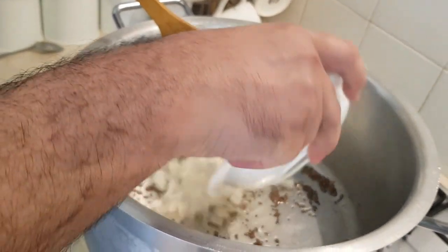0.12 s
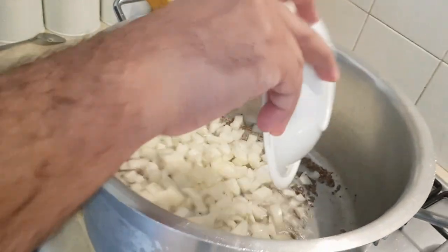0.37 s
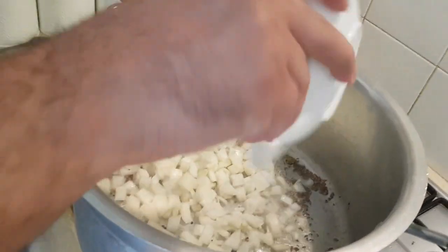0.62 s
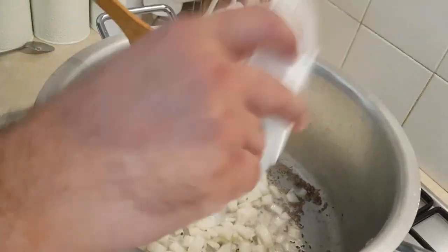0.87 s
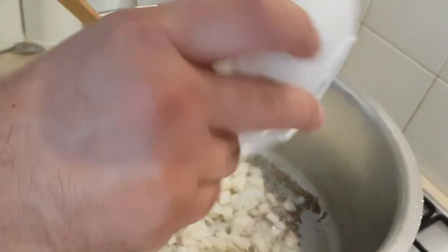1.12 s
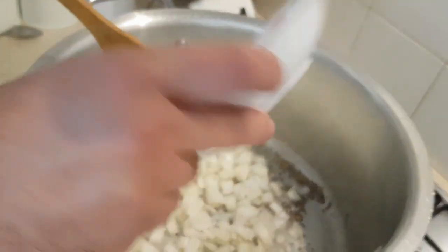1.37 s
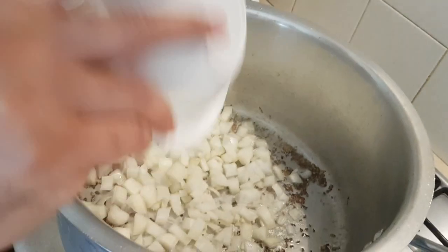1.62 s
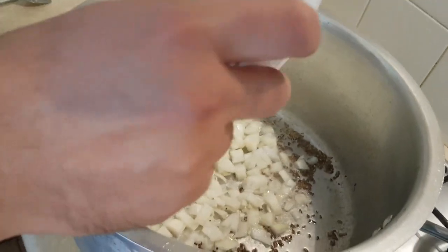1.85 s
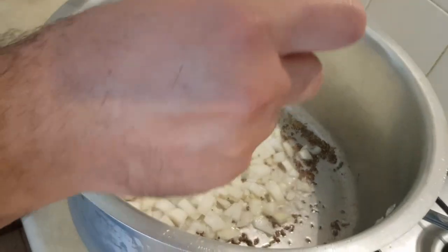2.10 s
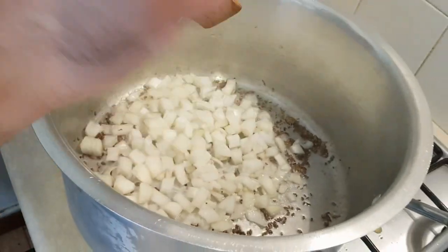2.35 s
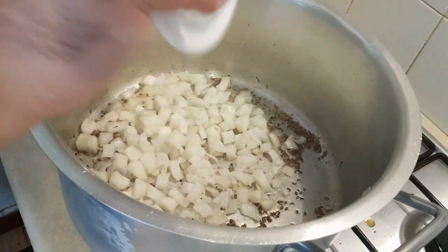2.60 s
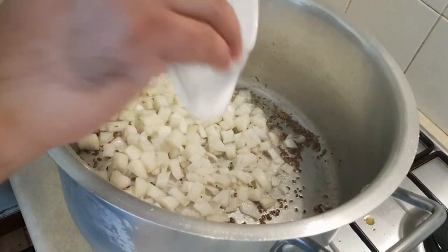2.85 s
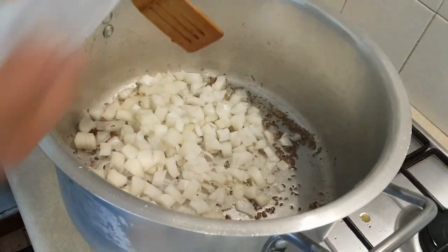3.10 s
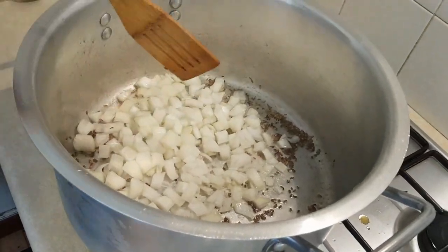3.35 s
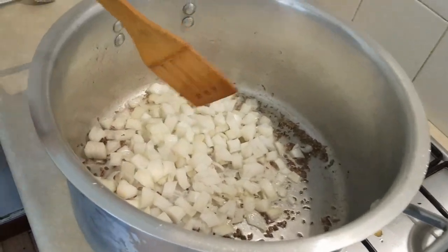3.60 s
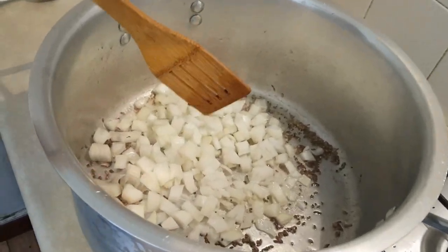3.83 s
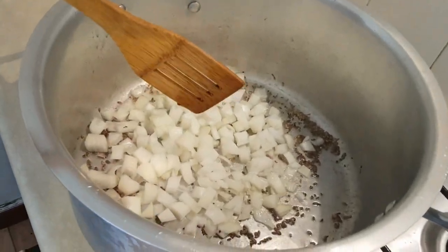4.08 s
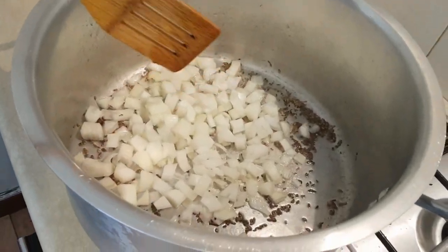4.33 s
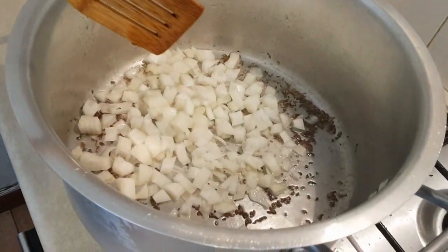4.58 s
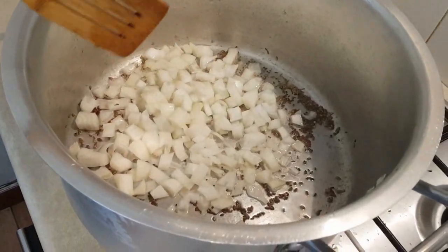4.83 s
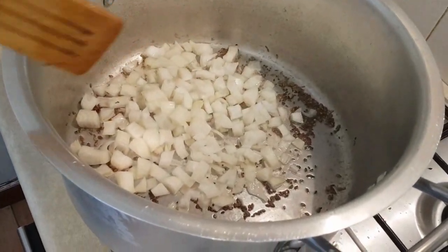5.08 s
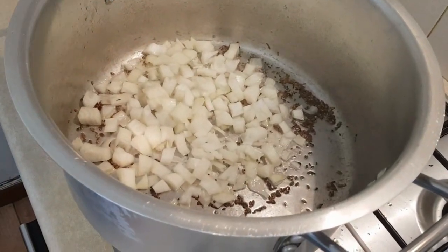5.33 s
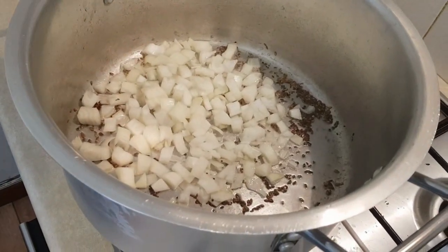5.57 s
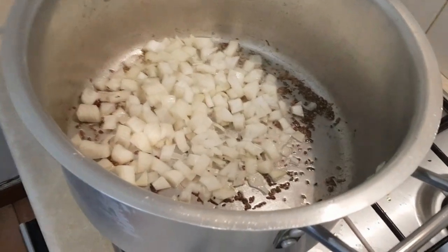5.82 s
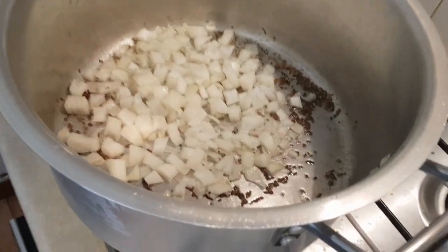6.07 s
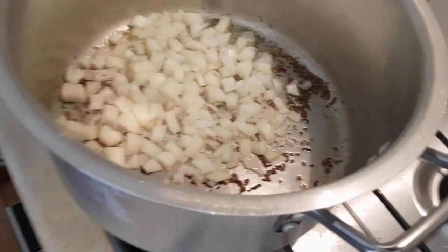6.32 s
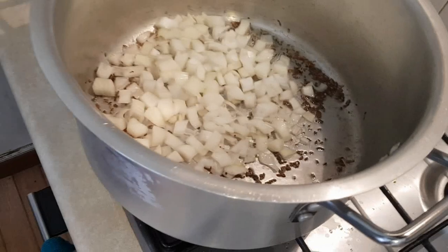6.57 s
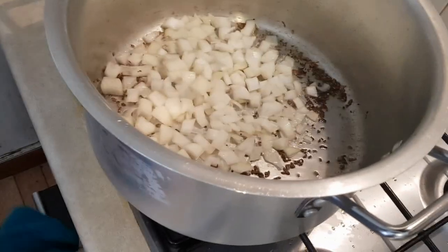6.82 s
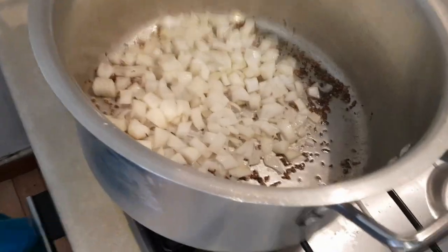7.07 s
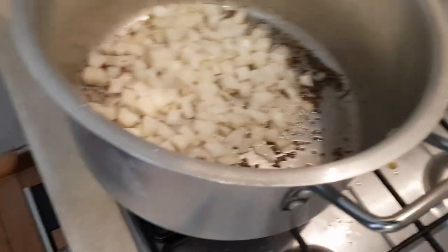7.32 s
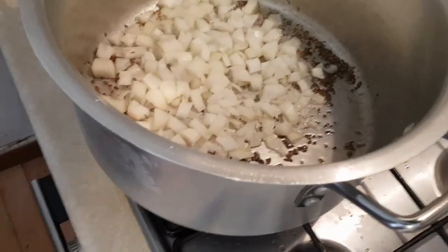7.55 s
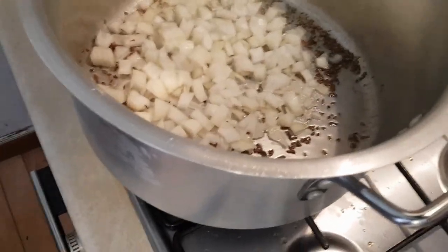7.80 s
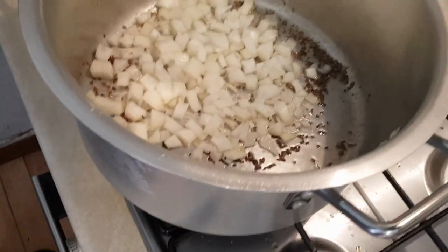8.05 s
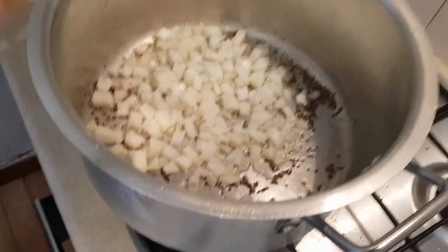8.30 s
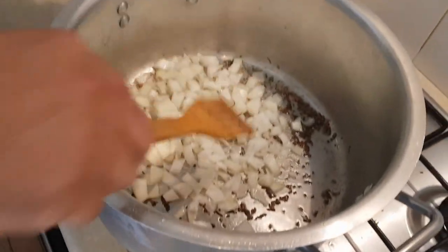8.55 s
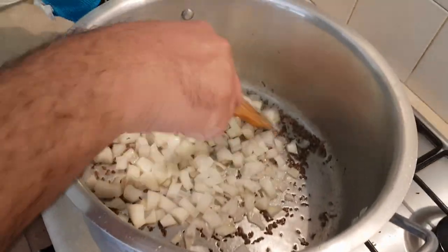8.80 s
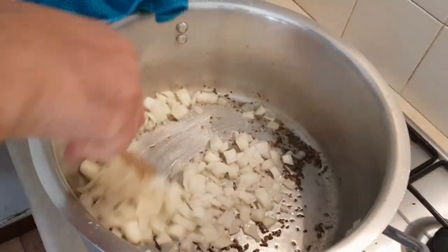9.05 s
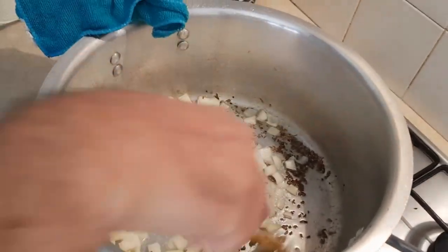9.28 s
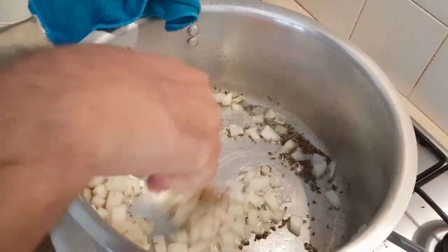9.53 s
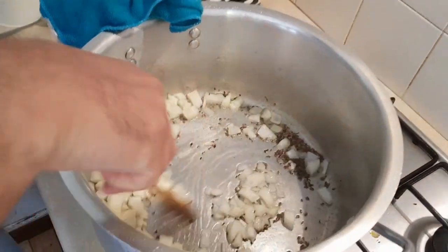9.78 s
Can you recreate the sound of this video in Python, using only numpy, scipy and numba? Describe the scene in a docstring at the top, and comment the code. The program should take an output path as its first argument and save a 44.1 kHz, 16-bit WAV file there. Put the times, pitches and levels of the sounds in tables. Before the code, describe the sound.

Diced onions tumble into hot oil in a wide metal pot, flare into a loud sizzle, then fry steadily with pops until a spatula stirs them.

```python
"""Onions frying in a wide pot

Diced onions tumble into hot oil in a wide metal pot and sizzle; late on a wooden spatula stirs them.
Steam bubbles, made of thousands of short dying rings, echo round the pot, and single drops pop and spatter.
Noise and knocks through the pot's resonances make the falling pieces and the spatula on its bottom.
Something is set down on the counter with dull thuds of shaped noise, over a kitchen's mains hum and rumble.
A two-port microphone hears it all, with every source leaning left."""
import sys
import numpy as np
from scipy import signal
from scipy.fft import rfft, irfft, next_fast_len
from scipy.io import wavfile
from scipy.ndimage import uniform_filter1d
from numba import njit

SR = 44100
rng = np.random.default_rng(int(sys.argv[2]) if len(sys.argv) > 2 else 0)


def attenuation_scalar(level_db):
    """Turn a level in dB into a linear amplitude multiplier (20 dB per decade)."""
    decades = np.asarray(level_db, float) / 20
    return 10 ** decades


def inscribe(sig):
    """Save sig as 16-bit PCM at rate SR to the path in sys.argv[1].

    A 1-D sig is mono; a 2-D sig holds one channel per row.
    Samples are clipped to [-1, 1] before scaling.
    """
    pcm = np.round(np.clip(np.atleast_2d(sig).T, -1, 1) * 32767)
    wavfile.write(sys.argv[1], SR, pcm.astype(np.int16))


N = 437031
TIME = np.arange(N) / SR
SIDES = np.array([[1], [-1]])  # left, right


def curve(rows, column=1):
    """One column of a table, interpolated along time."""
    rows = np.array(rows, float)
    return np.interp(TIME, rows[:, 0], rows[:, column])


def along(points, hz):
    """Value of (Hz, value) points on a log frequency axis."""
    points = np.array(points, float)
    return np.interp(np.log(hz + 1), np.log(points[:, 0] + 1), points[:, 1])


def shape(x, gain):
    """Weights the spectrum by gain(Hz)."""
    size = next_fast_len(N)
    hz = np.arange(size // 2 + 1) * SR / size
    return irfft(rfft(x, size) * gain(hz), size)[..., :N]


def unit(x):
    """Scales the middle of the image to rms 1."""
    return x / np.std(np.mean(np.atleast_2d(x), axis=0))


def band(x, lo_hz, hi_hz):
    """Band-pass."""
    return signal.sosfilt(signal.butter(2, [lo_hz, hi_hz], "bandpass", fs=SR, output="sos"), x)


def pan(x, left_db):
    """Makes the left louder than the right by left_db."""
    return x * attenuation_scalar(left_db * SIDES / 2)


def walk(rate):
    """Random levels, each held 1 / rate s and slewed to the next; spread 1."""
    hold = int(SR / rate)
    levels = np.repeat(rng.standard_normal(N // hold + 1), hold)
    levels = uniform_filter1d(levels, hold // 2 + 1)[:N]
    return levels / levels.std()


def swell(s, rise_s, hold_s, fall_s):
    """Envelope that rises to 1 at s, holds, then dies away, to a third in about fall_s."""
    rise = np.clip(1 + (TIME - s) / rise_s, 0, 1) ** 2
    return rise * np.exp(-np.maximum(TIME - s - hold_s, 0) / fall_s)


def even(x, over_s):
    """Divides noise by its own smoothed loudness, so its level holds steady over over_s; rms near 1."""
    power = uniform_filter1d(np.mean(x, axis=0) ** 2, int(over_s * SR))
    return x / np.sqrt(power + 0.061 * power.mean())


@njit
def grains(count, start, hz, cycles, size, lag):
    """Each burst is a short dying ring that reaches the two ports lag samples apart."""
    out = np.zeros((2, count + 8192))
    for g in range(len(start)):
        # turn and decay per sample: down to about a third after the given cycles
        step = np.exp((2j * np.pi - 1 / cycles[g]) * hz[g] / SR)
        length = min(int(6 * cycles[g] * SR / hz[g]) + 2, 3000)
        for c in range(2):
            t = start[g] + 64 + (c - .5) * lag[g]
            i = int(t) + 1
            z = size[g] * step ** (i - t)  # starts between samples
            for k in range(length):
                out[c, i + k] += z.imag
                z *= step
    return out[:, 64:count + 64]


def bursts(start, hz, size, cycles, echo_db=-5, t60_s=.05, aside=0.37, count=5):
    """Direct rings plus echoes off the pot walls; every burst has its own place, so its own echoes."""
    u = rng.random((len(start), count + 1, 2)).T
    late = t60_s / 3 * u[0] * (np.arange(count + 1) > 0)[:, None]  # s; the first is the direct sound
    sign = np.where(late > 0, np.sign(u[1] - .5), 1)
    gain = sign * attenuation_scalar(min(echo_db, -4) * (late > 0) - 60 * late / t60_s)
    # up to 22 samples between the ports; direct sound comes from nearer the middle
    lag = 44 * (u[1] - .5) * np.where(late > 0, 1, aside)
    every = lambda v: (v + 0 * late).ravel()
    return grains(N, every(start + late * SR), every(hz), every(cycles), every(size * gain), lag.ravel())


# Resonances of the pot bottom and of the air inside.
# Each row: frequency in Hz, width in Hz, relative level in dB.
POT_MODES = [(299, 48, -2), (398, 82, 1.5), (484, 140, 0), (653, 41, -5.5), (760, 23, -10.5),
             (826, 20.6, -5.5), (1250, 91, 5), (1496, 46, -8.5), (2059, 55, -0.5)]


def pot(push, upper_db=0):
    """The pot's resonances under a push; it is too small to send out bass."""
    out = 0
    for hz, width, db in POT_MODES:
        r, w = np.exp(-np.pi * width / SR), 2 * np.pi * hz / SR
        ring = signal.lfilter([np.sin(w), -np.sin(w)], [1, -2 * r * np.cos(w), r * r], push) / w
        out = out + attenuation_scalar(db + upper_db * (hz > 600)) * ring
    return band(band(out, 210, 3400), 210, 3400)


# How fiercely the oil fries. Each row: time in seconds, level of the small bubbles in dB.
FRYING = [(0, -30), (.04, -24), (.23, -19), (.39, -19.5), (.49, -21.5), (.55, -23), (.85, -25.5),
          (1.25, -29), (2.5, -31), (3.05, -30.5), (3.4, -29), (4.2, -29), (4.85, -30), (5.6, -30.5),
          (7.0, -30), (8.55, -32.5), (9.03, -30), (9.27, -23.5), (9.5, -24), (9.91, -24)]
# Brief changes of the frying.
# Each row: centre in seconds, reach to either side in seconds, change of small and of large bubbles in dB.
FLARES = [(3.2, .2, 1, -0.5), (3.8, 0.24, -1.5, -0.5), (4.38, 0.074, 3.5, 5), (5.275, 0.36, 1, 1.5),
          (6.813, 0.22, 1.5, -0.5), (7.473, 0.2, 0.5, 1.5), (8.077, 0.57, 1.5, 2)]
LARGE_DB, LARGE_PER_DB = -8.5, 0.5541  # large against small at -30 dB, and their extra gain per dB


def fierceness():
    """Levels of small and large bubbles in dB: the slow course plus the brief changes."""
    small = curve(FRYING)
    large = small + LARGE_DB + LARGE_PER_DB * (small + 30)
    for s, reach, small_db, large_db in FLARES:
        flare = np.clip(1 - abs(TIME - s) / reach, 0, 1)
        small = small + small_db * flare
        large = large + large_db * flare
    return small, large


def spurts(count, size_db, fade_s):
    """Sudden releases of steam that die away, in dB."""
    u = rng.random((count, 2)).T
    kick = np.zeros(N)
    kick[(u[0] * (N - 1)).astype(int)] = -size_db * np.log(u[1] + 1e-9)
    return np.minimum(signal.lfilter([1], [1, -np.exp(-1 / (fade_s * SR))], kick), 3.5)


# Colour of the bubble bursts. Each row: frequency in Hz, gain in dB.
BUBBLE_COLOUR = [(530, -21.5), (900, -12), (1180, -20), (1250, -17), (1650, -5.5), (1870, -9), (2500, -3.5),
                 (3510, -3), (4010, -2.5), (6920, -1.5), (12900, 6), (15600, 7), (16400, -63)]
CALMING_PER_DB = 1  # fiercer frying is denser, so single spurts and snaps stand out less


def bubbles(lo_hz, hi_hz, count, spread_db, cycles, spurt_db):
    """Bursts of steam at random pitches, their sizes drawn with spread_db, swelling in spurts."""
    u = rng.random((count, 3)).T
    calm = np.clip(2.5 - CALMING_PER_DB * (curve(FRYING) + 30), 0, 1)
    start = u[0] * (N - 1)
    hz = lo_hz + (hi_hz - lo_hz) * u[1]
    # a negative spread leaves some bursts quieter
    size_db = np.minimum(-spread_db * np.log(u[2] + 1e-9), 12) + (spurt_db * calm)[start.astype(int)]
    rings = bursts(start, hz, np.sqrt(hz) * attenuation_scalar(size_db), cycles)
    return unit(shape(rings, lambda f: attenuation_scalar(along(BUBBLE_COLOUR, f))))


def crackle(count):
    """Droplets that snap singly, each a dry click of its own pitch and size, a few far louder."""
    u = rng.random((count, 3)).T
    size = attenuation_scalar(np.minimum(-4.0 * np.log(u[2] + 1e-9), 13))
    snaps = bursts(u[0] * (N - 1), 4200 * 3.0 ** u[1], size, 1.2, -8, 0.0116, aside=0.15)
    return unit(band(snaps, 2600, 15000))


THIN_START_S = 0.26  # the low notes of the frying fill in as the oil gets covered
CRACKLE_DB = -14.5  # snaps against the small bubbles, at a fierceness of -32 dB


def sizzle():
    """Small and large steam bubbles share spurts and add their own; the large ones ring the pot."""
    spurt = 0.028 * walk(6.7) + spurts(count=400, size_db=1.5, fade_s=0.012)
    small_spurt = spurt + spurts(count=150, size_db=0.9, fade_s=0.02)
    large_spurt = 1.4 * spurt + spurts(count=160, size_db=4.0, fade_s=0.0043)
    small = bubbles(6800, 13870, count=60000, spread_db=0.0, cycles=0.59, spurt_db=small_spurt)
    large = bubbles(865, 5850, count=30000, spread_db=-0.5, cycles=1.26, spurt_db=large_spurt)
    # the fiercer the frying, the thinner its lowest notes
    opening = np.clip(1 - TIME / THIN_START_S, 0, 1)
    thinning = np.clip(0.039 * (curve(FRYING) + 30) + 0.7 * opening, 0, .9)
    large = large - thinning * band(large, 430, 4300)
    # the frying shakes the bottom and rings the air in the pot, which colours it
    shaking = rng.standard_normal((2, N)) + 0.62 * rng.standard_normal(N)
    shaken = unit(pot(shaking, 2.3))
    large = large + attenuation_scalar(-16.5) * shaken + attenuation_scalar(-15.5) * unit(pot(large, 15))
    snap_db = CRACKLE_DB - CALMING_PER_DB * (curve(FRYING) + 32.0)
    small = small + attenuation_scalar(snap_db) * crackle(count=5000)
    small_db, large_db = fierceness()
    return attenuation_scalar(small_db) * pan(small, 0.56) + attenuation_scalar(large_db) * pan(large, 3.3)


# Heaps of pieces landing on the bottom, later pushed along it.
# Each row: time in seconds, level in dB, upper modes against it in dB.
HEAPS = [(0.0, -37, 5), (.028, -29.5, -3), (.055, -32.5, 0), (0.083, -22, -8), (.1, -29, -6),
         (.12, -24.5, -4), (0.148, -18.5, -9), (0.186, -29, -6), (.213, -21, -11), (.255, -28, -17),
         (.275, -30, -17), (.335, -32, -17), (0.378, -33.5, -10), (9.56, -55, 2), (9.63, -47, 7),
         (9.765, -37, -10), (9.835, -39, -2)]
LAND_S, SETTLE_S = 0.0093, 0.015  # rise, and time to fall to a third
# The spatula dragged along the bottom.
# Each row: time in seconds, level in dB, upper modes against it in dB.
SCRAPE = [(9.06, -57, 4), (9.15, -47, 2), (9.27, -56, 3), (9.44, -60, 8), (9.51, -40, -15), (9.57, -43, -9),
          (9.7, -63, 7), (9.78, -47.5, 3), (9.85, -43, -3), (9.91, -47, 6)]
RING_DB = -5  # the highest modes against the upper ones
RASP_DB = -6.5  # dry broad noise of the wood against the ringing of the pot


def heaps_and_scrape():
    """Soft pieces landing and wood sliding: dense contacts as noise, rung in three bands of the pot."""
    hail = rng.standard_normal((3, N))
    hail = hail[0] + 0.87 * hail[1:]  # partly alike at the two ports
    rung = pot(hail)
    low = band(rung, 280, 454)
    high = band(band(rung, 682, 780), 570, 890)
    highest = band(rung, 1270, 2200)
    rasp = band(hail, 160, 1250)
    low_push = sum(attenuation_scalar(db) * swell(s, LAND_S, 0, SETTLE_S) for s, db, upper_db in HEAPS)
    high_push = sum(attenuation_scalar(db + upper_db) * swell(s, LAND_S, 0, SETTLE_S) for s, db, upper_db in HEAPS)
    drag = attenuation_scalar(curve(SCRAPE)) * (TIME > SCRAPE[0][0])
    low_push = low_push + drag
    high_push = high_push + drag * attenuation_scalar(curve(SCRAPE, column=2))

    def driven(noise, push):
        return uniform_filter1d(push, int(0.014 * SR)) * even(noise, 0.022)

    patter = driven(low, low_push) + driven(high, high_push) + attenuation_scalar(RING_DB) * driven(highest, high_push)
    return patter + attenuation_scalar(RASP_DB) * driven(rasp, drag)


# Single knocks on the pot. Each row: time in seconds, relative level in dB, pitch of the push in Hz
# (higher is harder), crack against the level in dB before a common trim, cycles of ring to fall to a third.
KNOCKS = [(0.376, -29, 810, 5, 5.6), (1.409, -45, 883, 18.5, 1.4), (3.713, -30, 806, 2, 1.9),
          (3.926, -30, 950, -4, 1.4), (4.105, -28, 398, -6, 1.2), (4.112, -29, 826, 1, 1.3),
          (4.63, -29, 1600, -6, 3), (5.43, -31, 830, 2, 1.2), (6.334, -33, 1100, 12.5, 0.8),
          (6.39, -30, 1480, 4, 1.4), (8.805, -38, 840, -7, 1.4), (8.876, -33.5, 784, -2, 5)]


def knocks():
    """Each knock is one ringing push, heard bare and through the pot, with a short crack on top."""
    s, db, hz, crack_db, cycles = np.transpose(KNOCKS)
    push = bursts(s * SR, hz, attenuation_scalar(db), cycles, 0.0, 0.0387, aside=.1)
    crack = bursts(s * SR, 1900 + 0 * s, attenuation_scalar(db + crack_db + 8.5), 0.67, -2, 0.0173, aside=.1)
    return attenuation_scalar(-40.5) * pot(push, 7.6) + .5 * push + crack


def bottom():
    """Everything that strikes or slides on the bottom of the pot, well to the left."""
    return pan(heaps_and_scrape() + knocks(), 4.3)


# Hum as the recorder hears it: its automatic gain probably ducks hum and rumble after the loud pour,
# then recovers; here a typed curve. Each row: time in seconds, hum in dB.
HUM_LEVEL = [(0, -43), (.6, -54), (2.2, -50.5), (4.6, -46), (9.91, -45.5)]
# Colour of the rumble. Each row: frequency in Hz, relative gain in dB.
RUMBLE_COLOUR = [(20, -62), (48, -1), (96, -5.5), (122, -8), (151, -14.5), (195, -19), (255, -9),
                 (347, -12), (424, -7.5), (586, -15.5), (826, -13.5), (1080, -15.5), (1500, -34),
                 (1950, -51), (3300, -120)]
# Likeness of the rumble at the left and right ports. Each row: frequency in Hz, likeness from 0 to 1.
RUMBLE_LIKENESS = [(30, 1), (100, 0.93), (250, 0.75), (600, 0.85), (1200, 0)]
HUM_HZ = 100.2
RUMBLE_DB, RUMBLE_PER_DB = -55, 1.08  # rumble at a hum of -46.5 dB; it dips a little deeper


def kitchen():
    """A wavering mains hum over low rumble that is much alike left and right."""
    phase = 2 * np.pi * np.cumsum(HUM_HZ + 0.42 * walk(6.6)) / SR
    hum = np.sqrt(2) * np.sin(phase) * attenuation_scalar(curve(HUM_LEVEL) + 0.27 * walk(13))
    mid, side = rng.standard_normal((2, N))
    like = lambda f: np.clip(along(RUMBLE_LIKENESS, f), 0, 1)
    mid = shape(mid, lambda f: attenuation_scalar(along(RUMBLE_COLOUR, f)) * np.sqrt(1 + like(f)))
    side = shape(side, lambda f: attenuation_scalar(along(RUMBLE_COLOUR, f)) * np.sqrt(1 - like(f)))
    rumble = (mid + SIDES * side) / band(mid, 194, 398).std()
    rumble_db = RUMBLE_DB + RUMBLE_PER_DB * (curve(HUM_LEVEL) + 46.5)
    return pan(hum, 0.77) + pan(rumble, 3.0) * attenuation_scalar(rumble_db)


# Thuds on the counter. Each row: time in seconds, level in dB, rise in seconds, hold in seconds.
THUDS = [(4.675, -31.5, 0.015, 0.053), (4.897, -42.5, 0.11, .02), (4.935, -33.5, 0.022, 0.049)]
# Low bumps through the worktop. Each row: start in seconds, level in dB, pitch in Hz.
BUMPS = [(0.401, -24.5, 66), (4.104, -41, 60), (4.69, -30, 50), (4.93, -30, 50)]
THUD_FALL_S, RATTLE_DB, RATTLE_S = 0.038, -15.5, 0.11  # fall to a third; a weaker rattle lingers
SCUFF_DB, SCUFF_S = -1, 0.06  # the brighter part and its fall to a third


def counter():
    """Dull rough thuds of noise heard through the room, with low bumps through the worktop."""
    noise = rng.standard_normal((3, N))
    noise = noise[0] + 1.0 * noise[1:]  # partly alike at the two ports
    body = even(band(band(noise, 234, 690), 170, 810), 0.012)
    scuff = unit(band(noise, 1020, 2230))
    thud = 0
    for s, db, rise, hold in THUDS:
        blow = swell(s, rise, hold, THUD_FALL_S) + attenuation_scalar(RATTLE_DB) * swell(s, rise, hold, RATTLE_S)
        bright = attenuation_scalar(SCUFF_DB) * swell(s, rise, 0, SCUFF_S) * scuff
        thud = thud + attenuation_scalar(db) * (blow * body + bright)
    s, db, hz = np.transpose(BUMPS)
    bump = grains(N, s * SR, 1. * hz, np.full(len(s), .7), attenuation_scalar(db), 0 * s)
    return pan(thud + bump, 4.4)


# Loud single pops. Each row: start in seconds, relative level in dB, pitch in Hz,
# low click against the level in dB before a common trim.
POPS = [(0.62, -10, 6000, -24), (0.802, -12, 5000, -23), (1.4113, -17, 5030, -20),
        (2.0532, -11, 12800, -18), (2.103, -12.5, 10900, -20), (2.2535, -20, 11100, -16),
        (3.166, -16, 5500, -11), (3.459, -10.5, 11800, -17), (3.715, -15, 5000, -9),
        (3.929, -13, 9070, -15), (3.9638, -14.5, 3990, -15), (3.9873, -13, 11400, -22),
        (4.39, -10, 5000, -11), (4.564, -12.5, 12900, -13), (5.097, -12, 8540, -34),
        (5.207, -10, 11200, -43), (5.246, -8, 11000, -31), (5.297, -12, 5500, -35),
        (5.403, -23.5, 11300, -1.5), (5.7289, -25, 11000, -34), (6.0277, -18, 5420, -25),
        (6.333, -16, 4000, -5), (6.6243, -14, 14700, -29), (6.743, -11, 11900, -17),
        (6.772, -9.5, 13700, -22), (6.9307, -12.5, 11700, -31), (6.956, -8, 6500, -23),
        (7.117, -8, 11000, -37), (7.3375, -12, 5000, -10.5), (7.4532, -10, 7740, -18),
        (7.499, -11, 11300, -29), (7.52, -10, 13100, -22), (7.645, -16, 3100, -31),
        (7.7315, -13, 9950, -18), (7.813, -17, 10200, -15), (8.0644, -11, 8500, -14),
        (8.14, -12, 11600, -33), (8.207, -13, 13200, -26), (8.376, -20.5, 6000, -6),
        (8.437, -13, 10800, -19), (8.463, -17.5, 4500, -13), (8.8097, -17.5, 12300, -10),
        (8.998, -17, 4940, -20), (9.68, -20, 5000, -3.5)]


def pops():
    """A drop bursts: a sharp crack, a duller click under it and a hiss of spatter that dies away."""
    s, db, hz, low_db = np.transpose(POPS)
    crack = band(bursts(s * SR, hz, attenuation_scalar(db + 2.0), 1.0, -9, 0.012, aside=0.02), 2400, 17000)
    click = bursts(s * SR, 2400 + 0 * s, attenuation_scalar(db + low_db + 9.5), 0.91, 6, 0.052, aside=0.063)
    t = np.arange(SR // 16) / SR
    hiss = rng.standard_normal((len(s), 2, len(t))) * np.exp(-t / 0.0088)
    spatter = np.zeros((2, N))
    for k in range(len(s)):
        puff = band(hiss[k], 0.56 * hz[k], min(1.45 * hz[k], 16500))
        i = int(s[k] * SR)
        spatter[:, i:i + len(t)] += attenuation_scalar(db[k] - 6.5) * puff
    return pan(crack + click + spatter, 3.1)


def scene():
    """All sources as they reach the two ports."""
    return sizzle() + bottom() + kitchen() + counter() + pops()


def low_pass(x):
    """Removes everything above the highest recorded frequency."""
    return signal.sosfilt(signal.butter(12, 17080, fs=SR, output="sos"), x)


def record(dry):
    """The deepest bass is rolled off; nothing is left above 16 kHz."""
    mix = signal.sosfilt(signal.butter(2, 38, "highpass", fs=SR, output="sos"), dry)
    mix = signal.sosfilt(signal.ellip(10, .3, 70, 16000, fs=SR, output="sos"), mix)
    return low_pass(mix)


dry = scene()
out = record(dry)
inscribe(out)
```